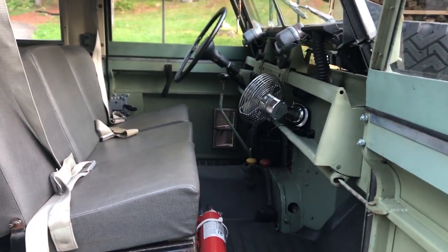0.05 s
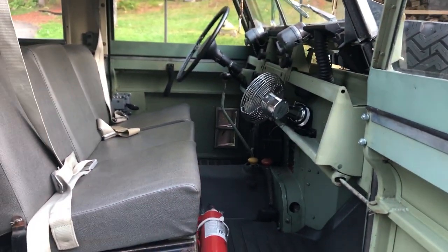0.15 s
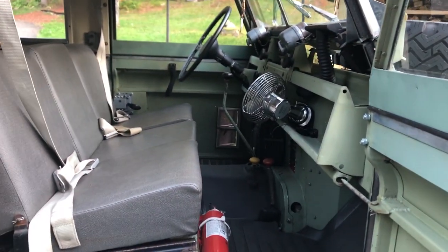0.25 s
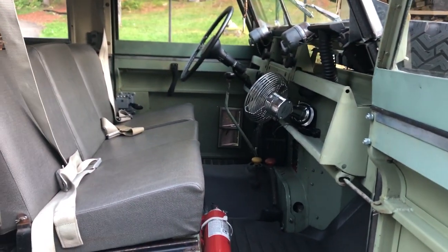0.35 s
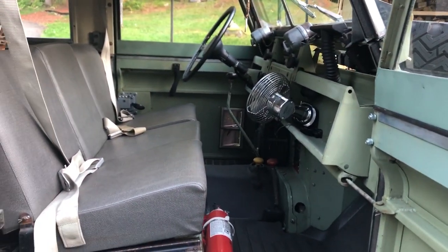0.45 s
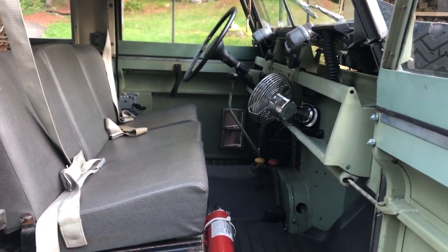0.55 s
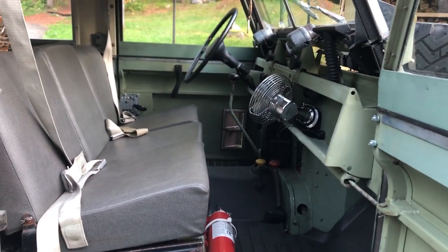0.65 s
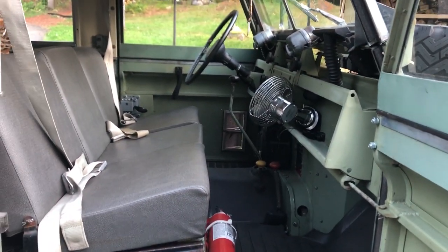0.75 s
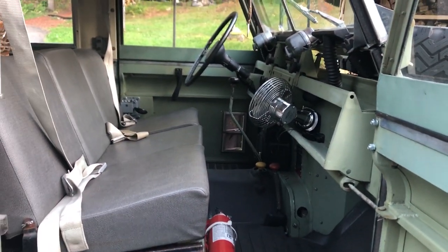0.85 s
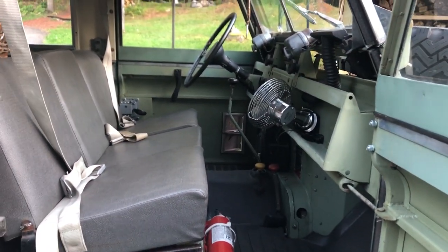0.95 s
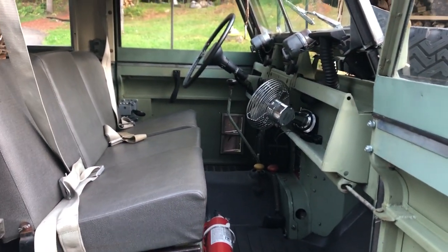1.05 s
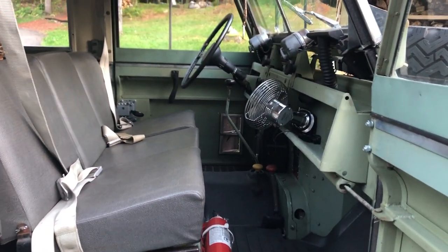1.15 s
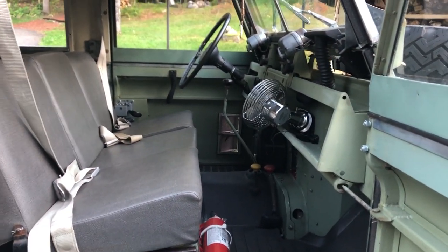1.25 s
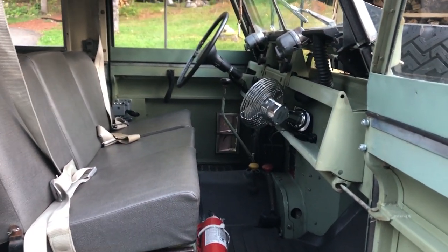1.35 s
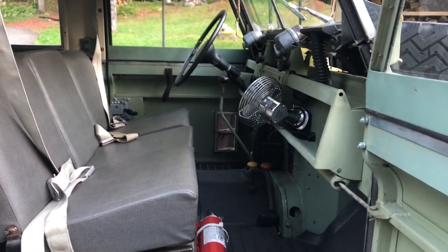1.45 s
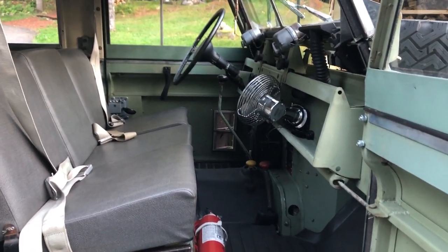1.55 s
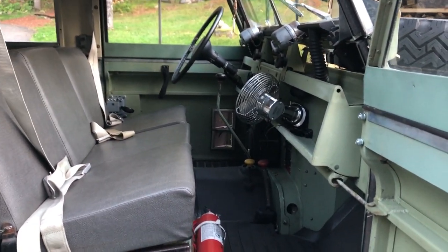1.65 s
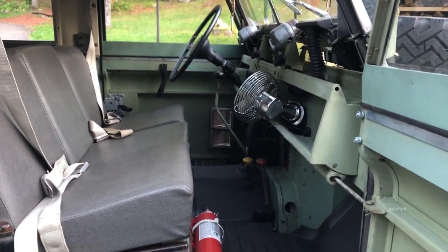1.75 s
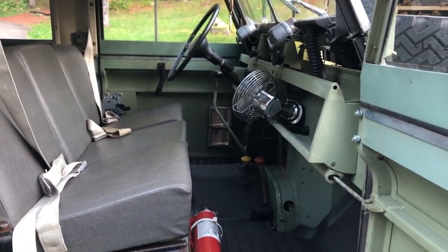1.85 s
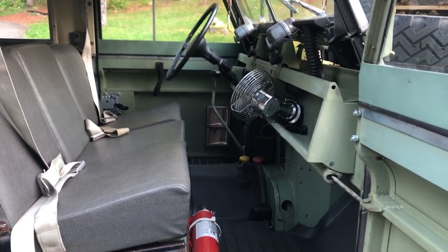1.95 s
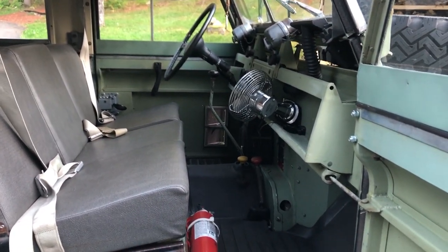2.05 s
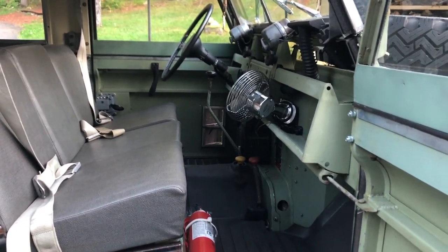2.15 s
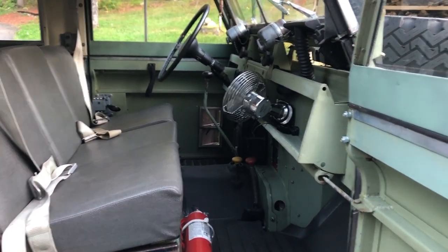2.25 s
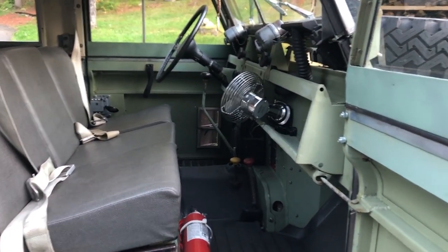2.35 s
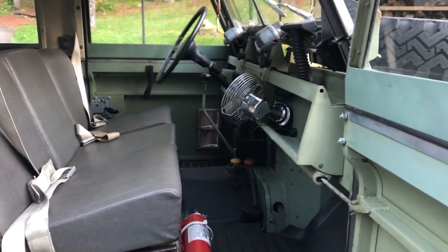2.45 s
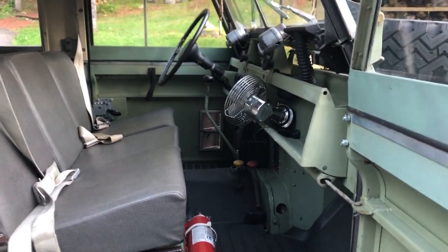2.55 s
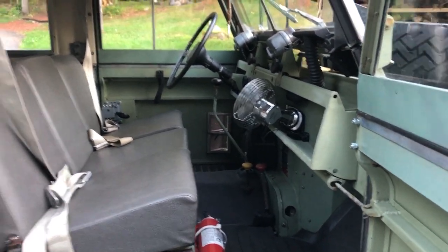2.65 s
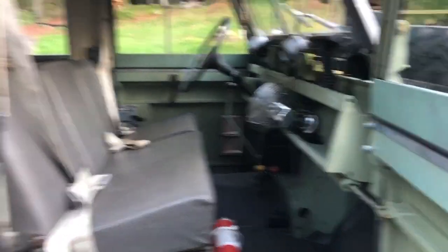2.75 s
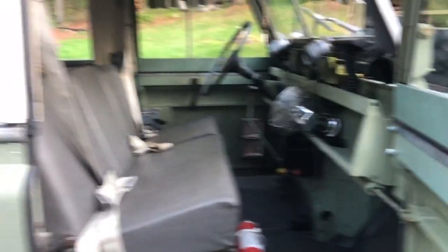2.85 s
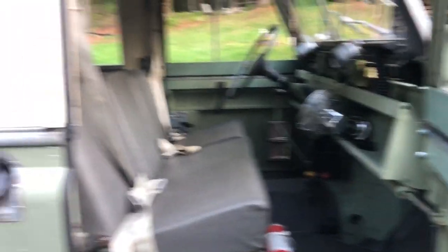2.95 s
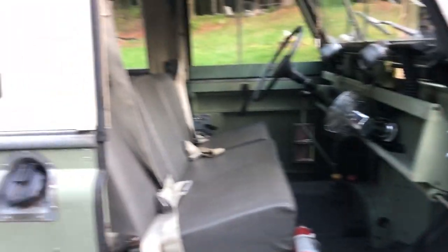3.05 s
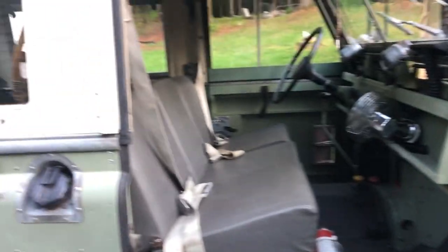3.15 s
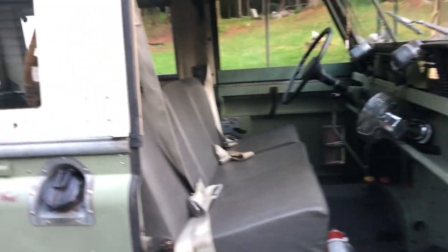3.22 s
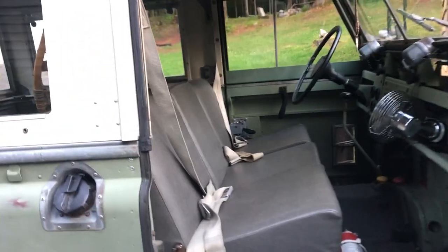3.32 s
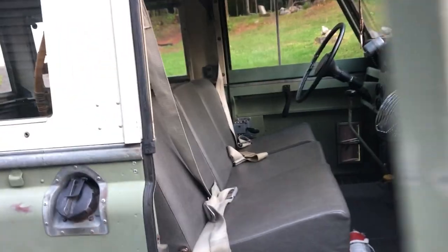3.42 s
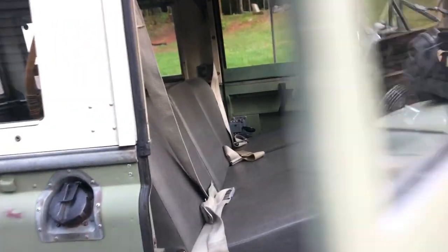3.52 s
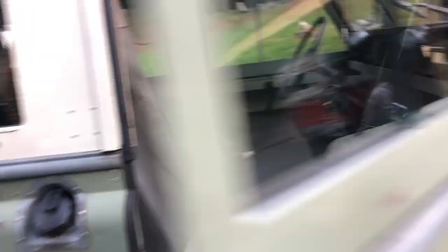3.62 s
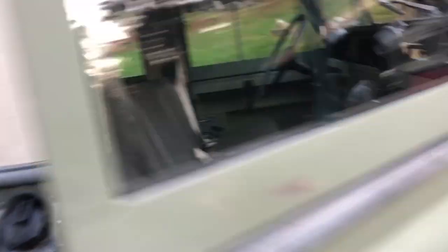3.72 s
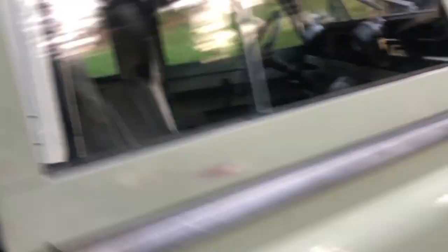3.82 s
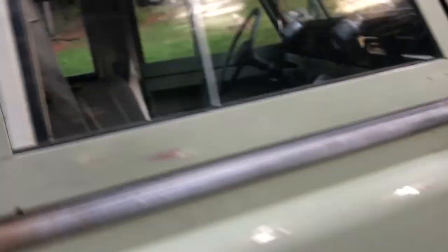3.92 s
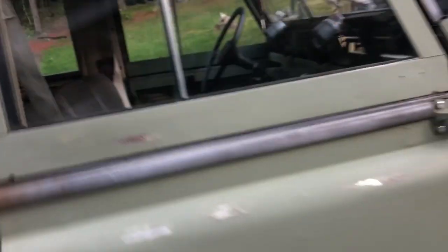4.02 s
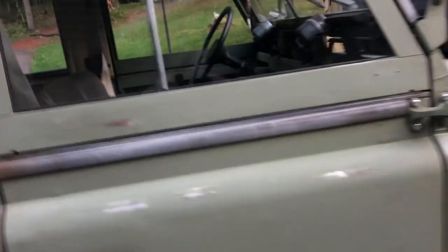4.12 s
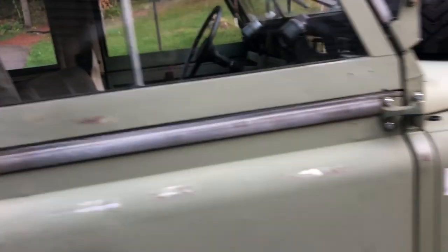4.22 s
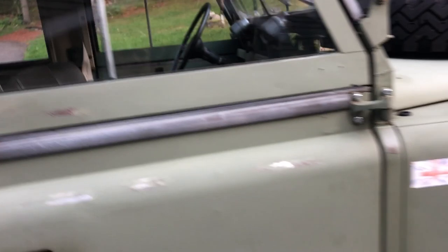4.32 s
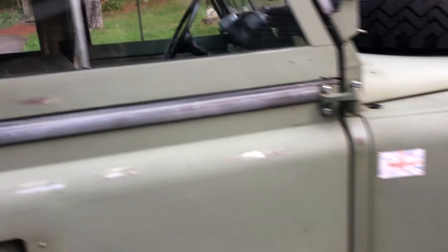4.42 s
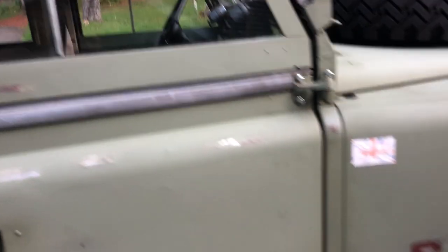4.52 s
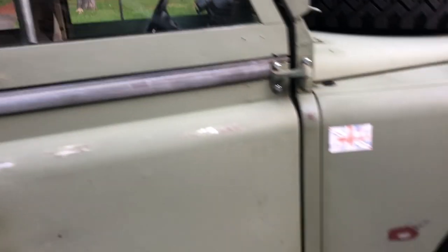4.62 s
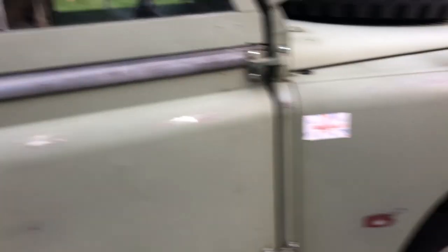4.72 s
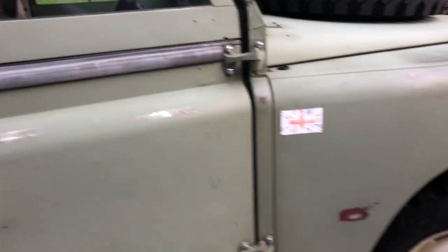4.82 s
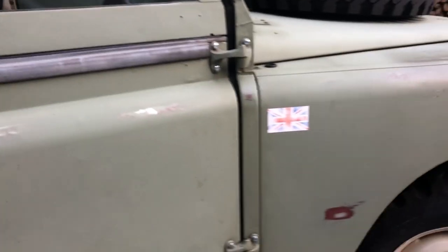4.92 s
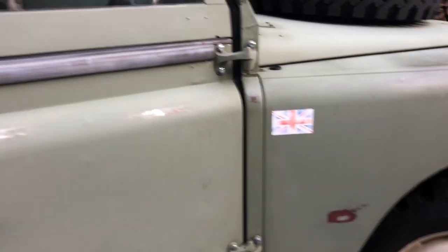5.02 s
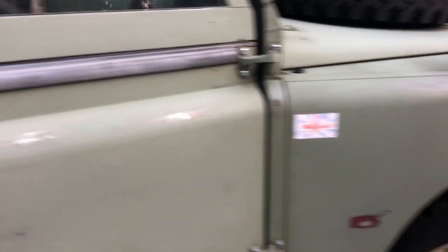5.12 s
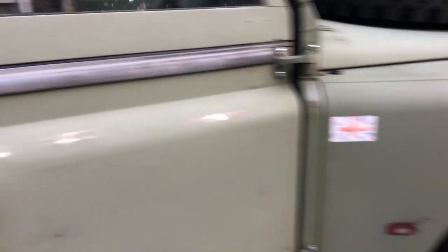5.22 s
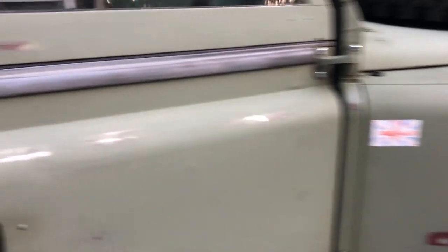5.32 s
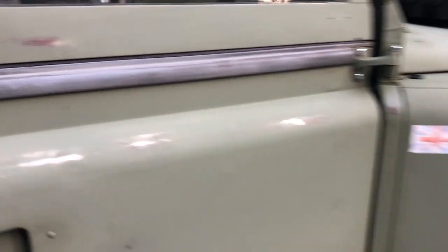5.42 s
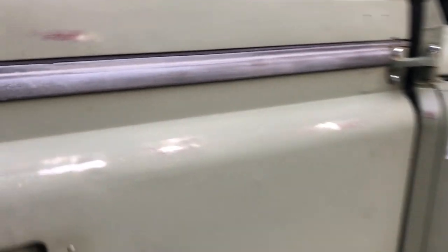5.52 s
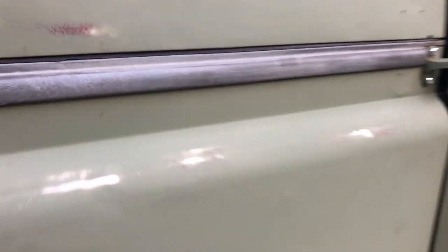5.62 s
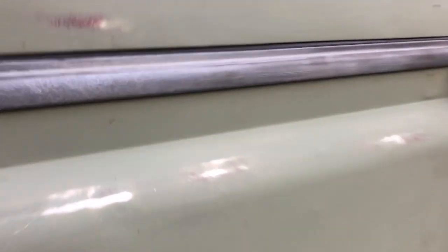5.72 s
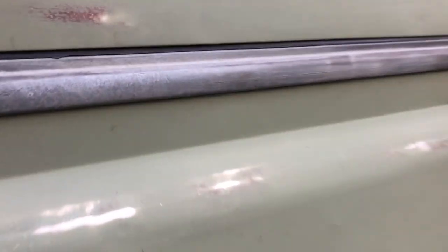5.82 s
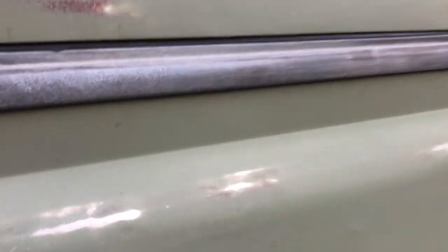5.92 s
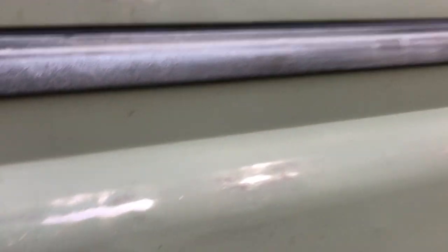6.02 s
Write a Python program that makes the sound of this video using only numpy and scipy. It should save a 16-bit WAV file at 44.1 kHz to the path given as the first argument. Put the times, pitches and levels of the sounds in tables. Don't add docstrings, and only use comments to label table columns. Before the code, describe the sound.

From 0 to 2.9 seconds there is quiet outdoor air: low soft hiss, a far faint cricket whirring, sparse very high insect ticks and barely audible cloth brushes. Around 2.9 the cricket recedes and a hinge drones very faintly. From 3.3 to 4.1 a hand slides on painted metal, with a soft click near 3.6, small ticks and stirred air. At 4.19 a heavy sheet-metal door slams very close: several hard steel latch cracks within about 0.15 seconds, the last strong one at 4.3, over deep cabin thump, clanging panels, bright sizzle and a brief very high squeal. Until about 5 the panels ring down while loose parts rattle rapidly over a low, slow flapping hum that lingers. A small liquid glug bends upward at 5.13. Tiny clicks come at 5.55 to 5.8, then soft hollow hand pats from 5.79, a dull shuffle, and a last light touch at 6.05.

```python
import sys
import numpy as np
from scipy import signal
from scipy.fft import rfft, irfft, next_fast_len
from scipy.io import wavfile
from scipy.ndimage import uniform_filter1d

SR = 44100
rng = np.random.default_rng(int(sys.argv[2]) if len(sys.argv) > 2 else 0)


def amplitude_ratio(level_db):
    exponent = np.asarray(level_db, float) / 20
    return 10 ** exponent


def unload_audio(sound):
    columns = np.transpose(np.atleast_2d(sound))
    steps = np.round(np.clip(columns, -1, 1) * 32767)
    wavfile.write(sys.argv[1], SR, steps.astype(np.int16))


N = 267585
T = np.arange(N) / SR


def evened(x):
    return x / np.sqrt(np.mean(x ** 2) + 1e-20)


def coloured(n, gain):
    size = next_fast_len(n)
    spectrum = rfft(rng.standard_normal(size)) * gain(np.fft.rfftfreq(size, 1 / SR) + 1)
    return evened(irfft(spectrum, size)[:n])


def door_noise(gain):
    start = 4 * SR
    return np.r_[np.zeros(start), coloured(N - start, gain)]


def uneven(n, size):
    return evened(uniform_filter1d(rng.standard_normal(n), size=size))


def bell(hz, octaves):
    return lambda f: np.exp(-.5 * (np.log2(f / hz) / octaves) ** 2)


def drawn(points):
    f, db = np.transpose(points)
    return lambda hz: amplitude_ratio(np.interp(np.log(hz), np.log(f + 1), db))


def peaked(peaks):
    return lambda f: np.sqrt(sum(amplitude_ratio(2 * db) / (1 + (2 * (f - hz) / w) ** 2) ** 2 for hz, w, db in peaks))


def add(mix, s, sound):
    part = mix[round(s * SR):][:len(sound)]
    part += sound[:len(part)]


def held(start, end, db, rise_db_per_s, fall_db_per_s):
    return amplitude_ratio(db - rise_db_per_s * np.maximum(start - T, 0) - fall_db_per_s * np.maximum(T - end, 0))


def ring(modes, seconds, rise=0.0013, spread=.0, scatter=1):
    t, out = T[:round(seconds * SR)], 0
    for hz, db, t60 in modes:
        phase, detune = rng.random(2)
        cycles = hz * (1 + spread * (detune - .5)) * t + scatter * phase
        out = out + amplitude_ratio(db - 60 * t / t60) * np.sin(2 * np.pi * cycles)
    return out * (1 - np.exp(-t / rise))


def tone(hz, octave_db):
    turn = 2 * np.pi * np.cumsum(hz) / SR
    return np.sqrt(2) * (np.sin(turn) + amplitude_ratio(octave_db) * np.sin(2 * turn + 2.2))


def knocks(rows, tail_db=-16, tail_by=3., less_db=-8):
    out = np.zeros(N)
    for s, db, hz, octaves, t60 in rows:
        t = T[:round(min(tail_by * t60, 1 / 3) * SR)]
        fall = amplitude_ratio(-60 * t / t60) + amplitude_ratio(tail_db - 60 * t / (tail_by * t60))
        crack = coloured(len(t), bell(hz, octaves)) * (1 - np.exp(-t / 0.00037))
        add(out, s, amplitude_ratio(db + less_db) * crack * fall)
    return out


# (time [s], peak level [dB], centre [Hz], width [octaves])
LATCH_BLOWS = [(4.1894, -4.5, 3000, 1), (4.208, -3.5, 3290, 1.8), (4.2214, -15.5, 2492, 1.4),
               (4.237, -14, 2508, 1.4), (4.246, -12.5, 2506, 1.3), (4.266, -12, 3986, .85),
               (4.2764, -14, 2491, 0.84), (4.2976, -5, 3500, 2), (4.3114, -21.5, 2498, 1.1),
               (4.3348, -21.5, 2790, .9), (4.351, -24, 3500, 0.96), (4.3864, -30.5, 3000, 1),
               (4.4014, -39, 3000, 1.2)]


def latch_blows():
    return knocks([(*row, 0.022) for row in LATCH_BLOWS], tail_db=-14, tail_by=7.5, less_db=-7)


# (time [s], strength [dB], extra boom [dB], extra sizzle [dB])
PANEL_JOLTS = [
    (4.191, -2, -4, -2.5),
    (4.218, -1, -1, 0),
    (4.238, 2, 0.5, 1),
    (4.266, -4.5, 3.5, 1),
    (4.299, -2, -5, 0.5),
    (4.322, -6.5, 2.5, 1.5),
    (4.342, -9.5, 1, 0),
    (4.405, -21, 15, -4),
]


def shaking(layer, db, rise, t60, tail_db, tail_t60):
    energy, t = np.zeros(N), T[:2 * SR]
    drain = amplitude_ratio(-120 * t / t60) + amplitude_ratio(2 * tail_db - 120 * t / tail_t60)
    answer = (1 - np.exp(-t / abs(rise))) * drain
    for s, strength_db, boom_db, sizzle_db in PANEL_JOLTS:
        extra_db = (boom_db, 0, sizzle_db)[layer]
        add(energy, s, amplitude_ratio(2 * (db + strength_db + extra_db)) * answer)
    return np.sqrt(energy)


# (centre [Hz], width [Hz], level [dB])
PANEL_BOOM = [
    [(62, 21, -10), (87, 24, -6), (131, 33, -8.5), (175, 21, -2), (213, 17, -3), (240, 14, -6), (265, 30, -4), (298.2, 8.8, -2.5)],
    [(62, 15, -9.5), (86, 13, -8.5), (111.9, 20, -4), (145, 14, 0), (177.5, 20, -4.5), (210, 31, -7.5), (250, 25, -8), (282.7, 68, -9)],
]
# (frequency [Hz], level [dB per Hz])
PANEL_CLANG = [
    [(190, -39.5), (320, -8.5), (413, -0.5), (472, -10.5), (504, -7.5), (755, -9), (820, -5), (928, -10.5), (1300, -9.5), (1560, -16), (2300, -20), (2990, -46), (5060, -120)],
    [(190, -31), (320, -3), (387, -2), (420, -3), (624, -12), (840, -12), (913, -10.5), (1270, -20), (1470, -17.5), (1900, -20), (2300, -30), (2990, -48.5), (5060, -120)],
]
# (frequency [Hz], level [dB per Hz])
PANEL_SIZZLE = [
    [(1240, -31.5), (2100, -4), (3100, 1), (4260, -1.5), (4600, -8), (13200, -15.5), (15100, -12), (16100, -17), (16500, -44)],
    [(1240, -30.5), (2100, 0), (3620, 0), (4260, -4.5), (4770, -6), (12100, -27.5), (15000, -25.5), (16100, -30), (16500, -53.5)],
]
# (level [dB], rise [s], t60 [s], tail level [dB], tail t60 [s])
PANEL_ANSWERS = [
    (-20.5, .006, 0.39, -6, 1.4),
    (-18.5, 0.0023, 0.23, -22.5, 1.6),
    (-21, .003, 0.12, -29, 1.15),
]
# (from [s], to [s])
COLOUR_TURNS = (4.31, 4.45)


def shaken_panels():
    out, late = np.zeros(N), np.interp(T, COLOUR_TURNS, (0, 1))
    gains = [[peaked(p) for p in PANEL_BOOM], [drawn(p) for p in PANEL_CLANG], [drawn(p) for p in PANEL_SIZZLE]]
    tails_db, clatters_db = (-6, -1.5, -.4), (0., 1, 2.5)
    for layer, (blow, tail) in enumerate(gains):
        colour = np.sqrt(1 - late) * door_noise(blow)
        colour += np.sqrt(late) * amplitude_ratio(tails_db[layer]) * door_noise(tail)
        clatter = amplitude_ratio(clatters_db[layer] * (uneven(N, 200) - .3))
        out += shaking(layer, *PANEL_ANSWERS[layer]) * clatter * colour
    return out


# (frequency [Hz], level [dB], t60 [s])
SKIN_MODES = [(106.2, -30, 2), (117.6, -32, 2.1), (132, -28, 1.1), (149.5, -27, 1.4), (173, -25, 1.0),
              (214, -31, .6), (235, -35.5, 0.82), (270.7, -27.5, 0.11), (285, -29.5, 1.6),
              (321.5, -34.5, 0.87), (318, -47, 1.6), (409, -34, .9), (366, -40, 1.2), (470, -46, 1.2),
              (476, -32, 0.52), (549, -33, .5), (603, -31, 0.45), (760, -52, 1.3), (850, -43, .7),
              (950, -50.5, 1.1)]
# (frequency [Hz], level [dB], t60 [s])
CABIN_MODES = [(134, -22, .3), (172, -16.5, 0.45), (210, -16, 0.45), (248, -17, .25), (268, -16, .22),
               (296, -16, .2), (409, -22, 0.25), (506, -27, .3), (603, -24, .2), (829, -22, .1),
               (1310, -23, .08)]


def skin_and_cabin():
    out = np.zeros(N)
    add(out, 4.235, ring(SKIN_MODES, 2.5, rise=.02))
    add(out, 4.236, ring(CABIN_MODES, .5, rise=0.004, scatter=0))
    return out


# (time [s], frequency [Hz], level [dB], t60 [s])
PITCHED_BITS = [(4.19, 2845, -12, .025), (4.19, 1850, -23, .03), (4.192, 760, -18, .04),
                (4.193, 375, -18, .06), (4.217, 810, -19, .05), (4.217, 380, -19, .06),
                (4.298, 2550, -21, .025), (4.33, 600, -24, .08), (4.19, 9000, -17, .03),
                (4.2085, 3225, -4.5, 0.024), (4.21, 2940, -12.5, 0.037), (4.209, 10700, -14.5, .018),
                (4.266, 5500, -21, 0.045), (4.387, 1705, -46.5, 0.32), (4.435, 1678, -47.5, 0.31),
                (4.299, 8450, -24, 0.036), (4.299, 4300, -16, 0.03), (4.3, 3484, -15.5, .04),
                (3.091, 3820, -61, 0.074), (3.8, 5000, -64, 0.036), (3.8, 6100, -77, 0.036),
                (5.587, 1383, -51, 0.026), (5.588, 1123, -55, .03), (5.775, 1700, -51.5, 0.042),
                (5.776, 2633, -59, 0.046), (5.775, 830, -47, 0.03), (6.05, 850, -58, .04),
                (6.049, 3480, -74.5, 0.096)]


def pitched_bits():
    out = np.zeros(N)
    for s, *mode in PITCHED_BITS:
        add(out, s, ring([mode], .3))
    return out


def pin_squeal():
    squeal = held(4.312, 4.314, db=-22, rise_db_per_s=1200, fall_db_per_s=990)
    after_ring = held(4.335, 4.35, db=-45, rise_db_per_s=900, fall_db_per_s=860)
    chatter = door_noise(peaked([(0.84, 349, 0)]))
    return (squeal + after_ring) * tone(14630 * np.ones(N), -np.inf) * (.6 + 0.9 * chatter)


# (level [dB], t60 [s])
FLAP_DECAYS = [(-20, .55), (-42.5, 3.5), (-50, 25.)]


def flap():
    rest_hz, stiffen_hz, start_s, rise_s = 41.4, 2.7, 4.222, .02
    t = np.maximum(T - start_s, 0)
    swing = sum(amplitude_ratio(db - 60 * t / t60) for db, t60 in FLAP_DECAYS) * (1 - np.exp(-t / rise_s)) ** 2
    return swing * tone(rest_hz + stiffen_hz * np.sqrt(swing / swing.max()), octave_db=-13)


# (time [s], peak level [dB], dull part
# level [dB])
LOOSE_KNOCKS = [(4.414, -42, -50), (4.436, -32, -47.5), (4.4594, -35.5, -55), (4.467, -42, -55),
                (4.492, -42, -47), (4.5316, -43, -52), (4.5555, -39, -48), (4.562, -41, -52),
                (4.581, -47, -49.5), (4.605, -52, -52), (4.6284, -43, -47), (4.635, -46, -52),
                (4.6597, -52, -48), (4.682, -56, -52), (4.7042, -47, -50), (4.7082, -48, -52),
                (4.7326, -44, -47), (4.738, -48, -52), (4.7582, -51, -50), (4.767, -53, -55),
                (4.7784, -51, -56), (4.786, -53, -56), (4.8304, -51, -54), (4.8374, -56, -54),
                (4.8543, -55, -52), (4.8613, -58, -52), (4.8793, -52, -56), (4.886, -56, -58),
                (4.906, -61, -57), (4.9302, -60, -48), (4.973, -68, -62)]
# (frequency [Hz], level [dB], t60 [s])
BRIGHT_MODES = [(4000, -4, .035), (4240, 1, 0.06), (5210, -8, 0.033), (6100, -10, 0.023), (3100, -8, 0.03),
                (7140, -14, .02), (9000, -14, 0.019)]
# (frequency [Hz], level [dB], t60 [s])
DULL_MODES = [(1023, 0, 0.11), (1300, -2.5, 0.047), (1660, -2, 0.09), (795, -3, 0.041), (610, -1.5, 0.054),
              (2120, -12, 0.025)]


def rattle():
    out = knocks([(s, db, 3300, .9, .05) for s, db, _ in LOOSE_KNOCKS], less_db=-13)
    out += knocks([(s, dull_db, 1100, .6, .09) for s, _, dull_db in LOOSE_KNOCKS], less_db=-10)
    for s, db, dull_db in LOOSE_KNOCKS:
        bright = amplitude_ratio(db - 10) * ring(BRIGHT_MODES, .1, rise=.0025, spread=0.04)
        dull = amplitude_ratio(dull_db - 3) * ring(DULL_MODES, .1, rise=0.0022, spread=0.076)
        add(out, s, bright + dull)
    return out


def glug():
    low_hz, top_hz, bend_s, climb_s = 195, 226, 5.135, 0.006
    climb = 1 / (1 + np.exp(-np.clip((T - bend_s) / climb_s, -20, 20)))
    climb += .12 * door_noise(peaked([(1, 40, 0)]))
    wobble = 1 + 0.25 * door_noise(peaked([(1, 62, 0)]))
    level = held(5.105, 5.172, db=-44, rise_db_per_s=770, fall_db_per_s=610)
    return level * wobble * tone(low_hz + (top_hz - low_hz) * climb, octave_db=-27.0)


# (time [s], level [dB])
HAND_PATS = [
    (5.786, -45),
    (5.793, -48),
    (5.826, -58),
    (5.838, -53),
    (5.89, -58),
    (6.045, -58),
]
# (frequency [Hz], level [dB], t60 [s])
PATTED_MODES = [(75.8, 3, 0.183), (140, -4, 0.5), (172, 1, 0.18), (206.4, -5.5, 0.25), (245, -10, 0.4),
                (284, -24, 0.84), (371, -5, .25), (430, -1, 0.08), (523, -12, 0.055), (740, -10, 0.06),
                (800, -9, 0.05), (856, -10, 0.09), (915, -15, .12)]


def pats():
    out = np.zeros(N)
    for s, db in HAND_PATS:
        add(out, s, amplitude_ratio(db) * ring(PATTED_MODES, .3, rise=0.0024, spread=0.018, scatter=.25))
    return out


def hinge():
    drone = held(2.88, 3.1, db=-86, rise_db_per_s=70, fall_db_per_s=150)
    catch = held(2.936, 2.942, db=-75.5, rise_db_per_s=500, fall_db_per_s=500)
    return (drone + catch) * coloured(N, peaked([(863, 60, 0)]))


# (time [s], peak level [dB], centre [Hz], width [octaves], t60 [s])
SMALL_TICKS = [(3.291, -58.5, 6000, 2.3, 0.048), (3.571, -44, 1780, 1.38, 0.039),
               (3.8, -53.5, 4370, 0.64, 0.028), (3.991, -55, 3980, 0.95, 0.024),
               (4.095, -58, 2520, 0.73, 0.033), (4.167, -49, 2500, 1.1, 0.2),
               (4.184, -42, 2000, 1.3, 0.035), (5.032, -55.5, 1200, 0.59, 0.056),
               (5.547, -55.5, 1091, 1.37, 0.066), (5.588, -56, 1300, 2, 0.032),
               (5.708, -56.5, 2043, 0.82, 0.085), (5.774, -43.5, 1480, 1.1, 0.08)]


def ticks():
    return knocks(SMALL_TICKS)


# (middle time [s], length [s], level [dB], centre [Hz], width [octaves])
CLOTH_BRUSHES = [(.35, .1, -86, 9000, 1.2), (1.024, .061, -70.5, 4000, 3.1),
                 (1.022, 0.084, -72, 3000, 0.58), (1.311, 0.033, -74.5, 2500, .95),
                 (1.738, 0.074, -73.5, 4940, 0.95), (1.966, .084, -73.5, 4430, 1.05),
                 (2.937, 0.049, -75.5, 6000, 2.6), (3.086, 0.076, -66.5, 5160, 1.16),
                 (3.32, .071, -72, 9000, 3.4), (3.861, 0.038, -60, 14000, 0.92),
                 (4.52, 0.13, -68.5, 9000, .88), (5.78, 0.016, -56.5, 2500, 1.9),
                 (5.829, .027, -67, 6000, 1.3), (5.832, .035, -63, 1500, .5),
                 (6.053, 0.046, -67.5, 895, 1.9)]
# (middle time [s], length [s], level [dB], centre [Hz])
HAND_SLIDES = [(3.441, 0.043, -74, 3770), (3.508, .066, -61.5, 2400), (3.565, 0.13, -61, 1930),
               (3.64, 0.07, -69, 2600), (3.866, 0.053, -61, 2630), (3.939, 0.089, -72, 2530),
               (4.012, 0.061, -70.5, 3770)]
# (middle
# time [s], length [s], level [dB], centre [Hz])
DULL_STROKES = [(.96, 0.16, -69, 240), (1.276, 0.12, -74, 195), (2.758, 0.17, -73, 95),
                (2.804, 0.12, -70, 400), (3.239, .021, -70, 700), (4.136, 0.13, -61.5, 400),
                (4.235, .05, -29.5, 75), (5.797, 0.036, -52, 170), (5.921, 0.43, -61.5, 160),
                (5.9, .25, -70, 380)]
# (middle time [s], length [s], level [dB], centre [Hz])
AIR_STIRS = [
    (3.3, 0.72, -79, 350),
    (3.951, 0.72, -68, 194),
    (5.604, 0.98, -78, 880),
]


def rustle():
    out = np.zeros(N)
    strokes = list(CLOTH_BRUSHES)
    for rows, octaves in ((HAND_SLIDES, 0.94), (DULL_STROKES, .7), (AIR_STIRS, 1.7)):
        strokes += [(*row, octaves) for row in rows]
    for s, seconds, db, hz, octaves in strokes:
        half = seconds + .05
        t = T[:round(2 * half * SR)] - half
        grain = amplitude_ratio(2.4 * uneven(len(t), 50))
        lumps = drawn(np.c_[np.geomspace(100, 16000, num=40), 2.6 * rng.standard_normal(40)])
        fibres = coloured(len(t), lambda f: bell(hz, octaves)(f) * lumps(f))
        stroke = np.cos(np.pi * np.clip(t / (1.74 * seconds), -.5, .5)) ** 2
        add(out, s - half, amplitude_ratio(db) * fibres * grain * stroke)
    return out


# (time [s], peak level [dB])
INSECT_TICKS = [(0.0593, -58), (0.7644, -60), (0.8294, -64), (1.1722, -59), (1.5713, -54), (1.9959, -57),
                (2.4264, -54), (2.9094, -72)]
# (frequency [Hz], level [dB per Hz])
AIR_COLOUR = [(12, -49.5), (20, -25.5), (35, -7.5), (75, 0), (178, -2), (235, -5.5), (683, -13),
              (1100, -15.5), (2090, -21), (2850, -22), (5000, -25.5), (10100, -31), (14900, -27.5),
              (16200, -37)]


def air():
    swell = uneven(N, 6000)
    hiss = amplitude_ratio(-70.5 + 0.26 * swell) * coloured(N, drawn(AIR_COLOUR))
    cricket_hz, cricket_db, chirps_per_s = 2525, -82.5, 14.
    chirps = np.cumsum(chirps_per_s * (1 + .08 * swell)) / SR
    wing = np.sin(np.pi * chirps)
    cricket_db = cricket_db + np.interp(T, (2.85, 3.1), (0, -14))
    rasp = amplitude_ratio(cricket_db - 11.5) * wing ** 2 * coloured(N, peaked([(cricket_hz, 120, 0)]))
    whistle = amplitude_ratio(cricket_db - 1.5) * abs(wing) * np.sin(2 * np.pi * cricket_hz * T)
    insects = knocks([(s, db, 15000, .17, .12) for s, db in INSECT_TICKS], tail_db=-10, tail_by=2.4, less_db=-17)
    return hiss + rasp + whistle + insects


def scene():
    panels = shaken_panels() + skin_and_cabin() + pitched_bits() + pin_squeal()
    door = latch_blows() + panels + flap() + rattle() + glug() + pats() + hinge()
    return (door + ticks() + rustle() + air())[None]


def top_cut(x):
    return signal.sosfilt(signal.butter(12, 16950, fs=SR, output="sos"), x)


# (from [s], to [s])
HIGH_TREBLE_SPANS = [
    (4.189, 4.194),
    (4.297, 4.318),
]


def record(dry):
    limited = 0.81 * np.tanh(dry / 0.72)
    edge_hz, wide_hz = 15850, 16850
    cut, wide = (signal.oaconvolve(limited, signal.firwin(511, hz, window=("kaiser", 9), fs=SR)[None], "same")
                 for hz in (edge_hz, wide_hz))
    cut += (wide - cut) * sum(held(*span, -3, 3000, 3000) for span in HIGH_TREBLE_SPANS)
    return top_cut(cut)


dry = scene()
out = record(dry)
unload_audio(out)
```